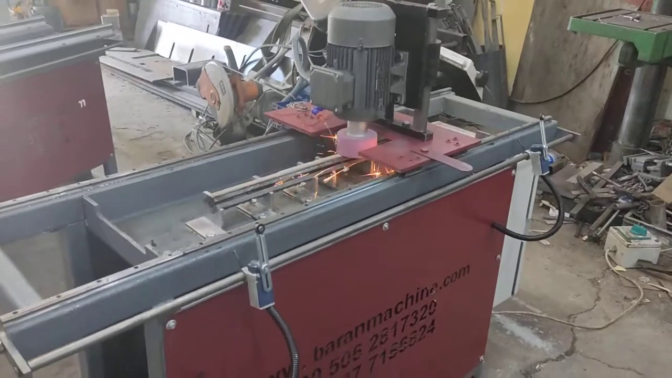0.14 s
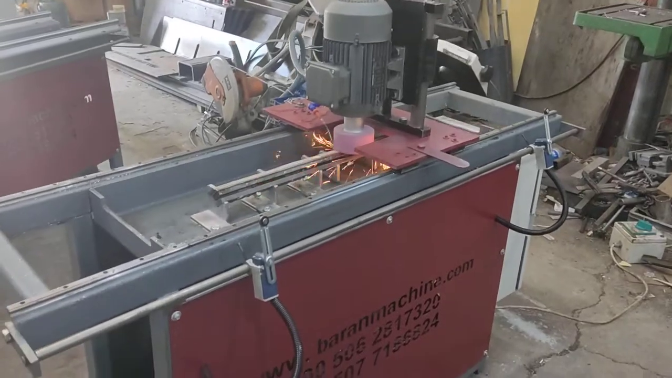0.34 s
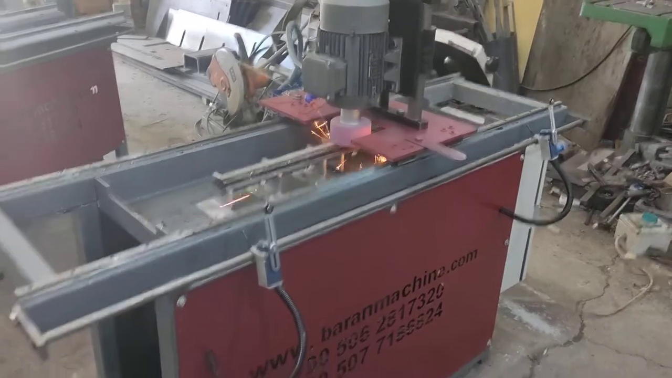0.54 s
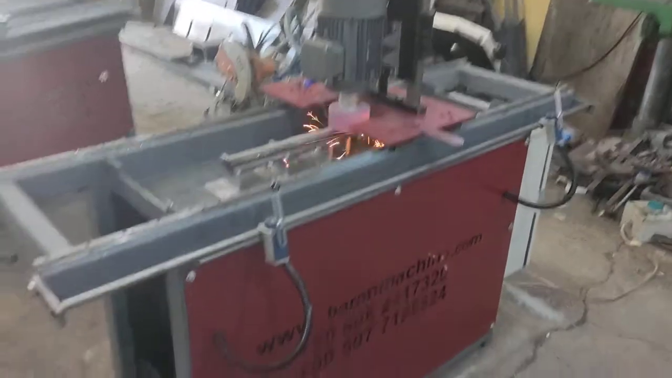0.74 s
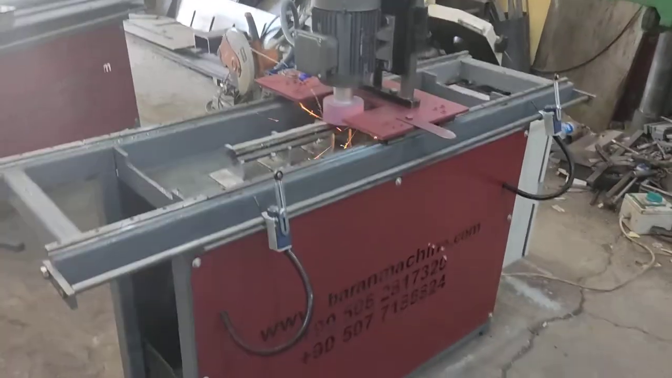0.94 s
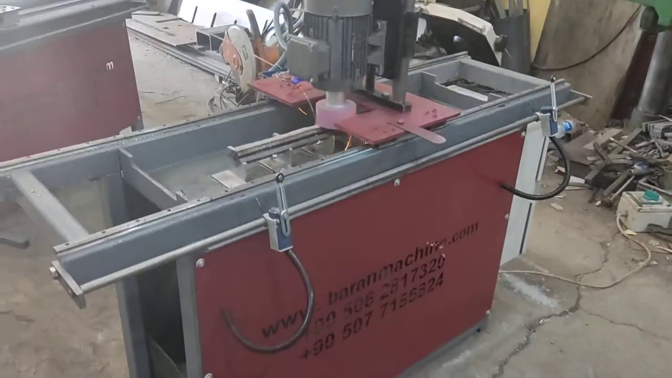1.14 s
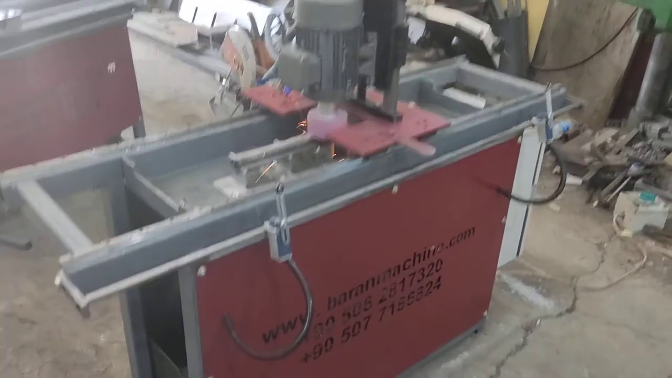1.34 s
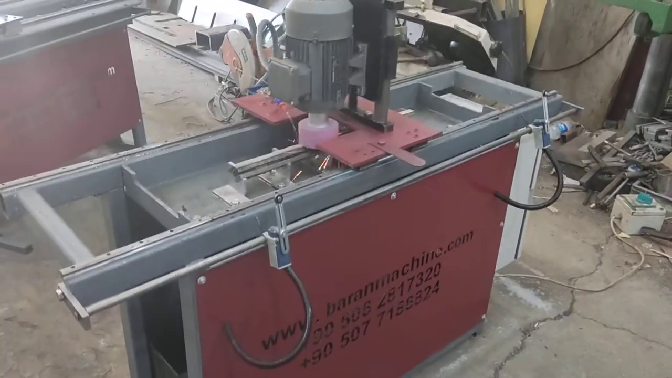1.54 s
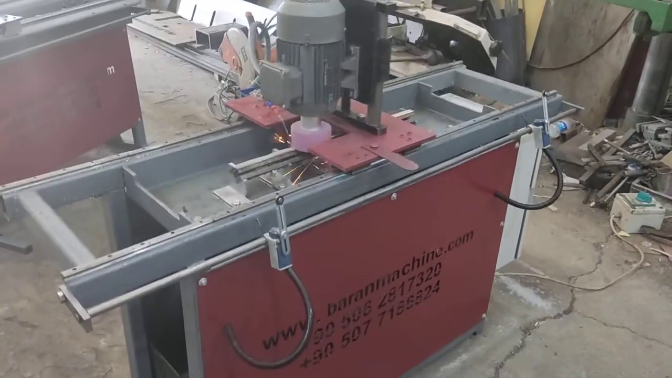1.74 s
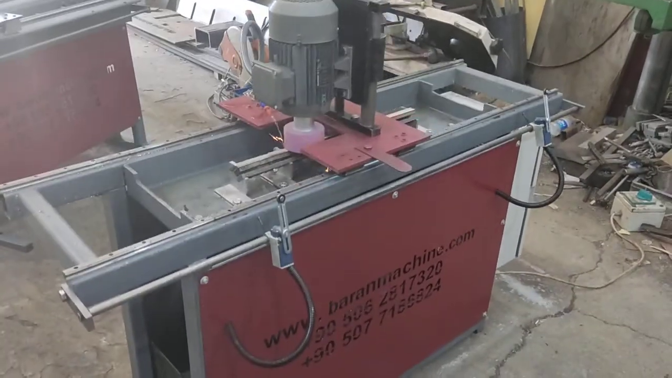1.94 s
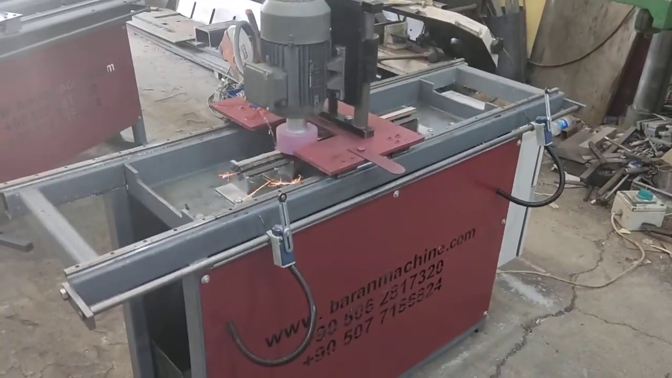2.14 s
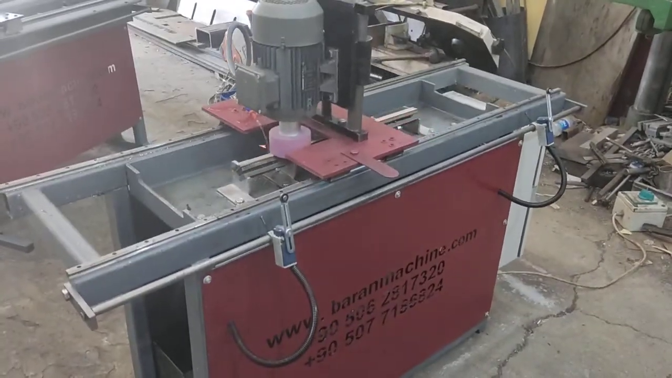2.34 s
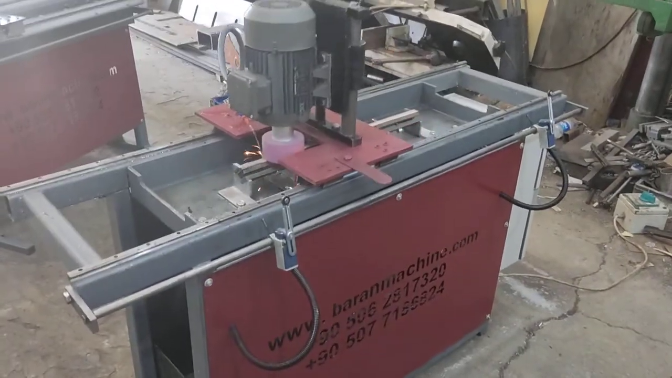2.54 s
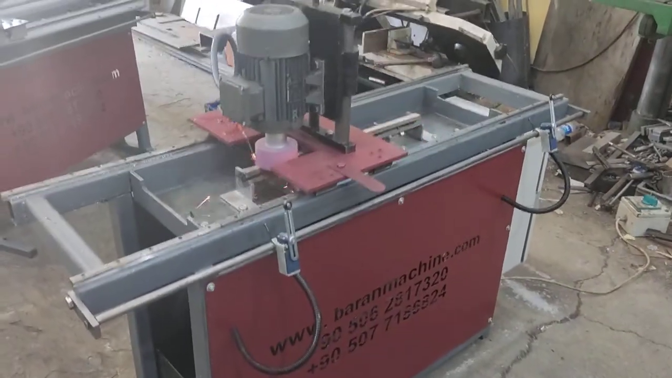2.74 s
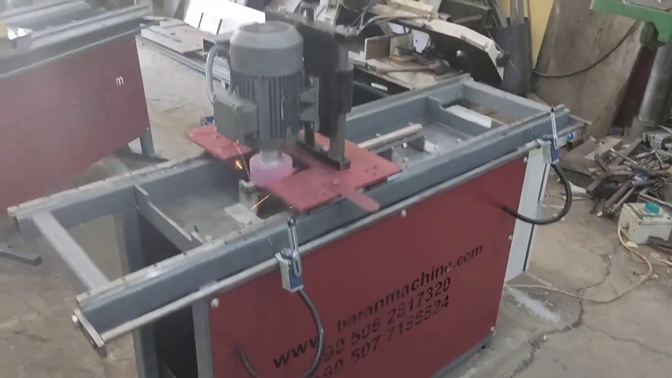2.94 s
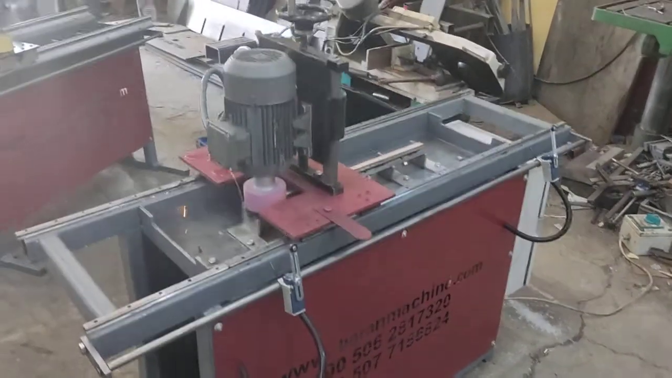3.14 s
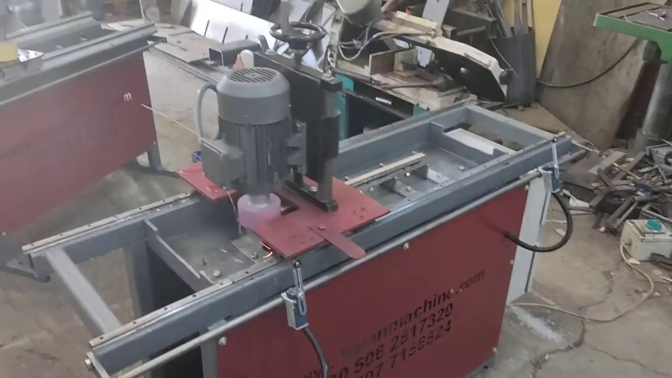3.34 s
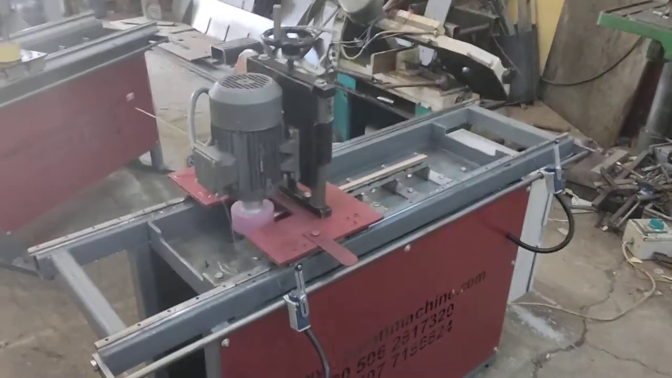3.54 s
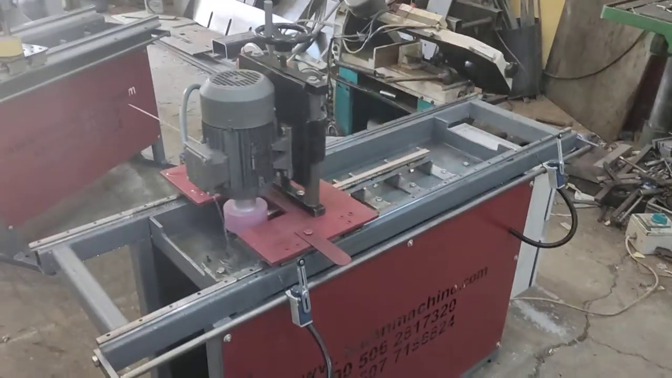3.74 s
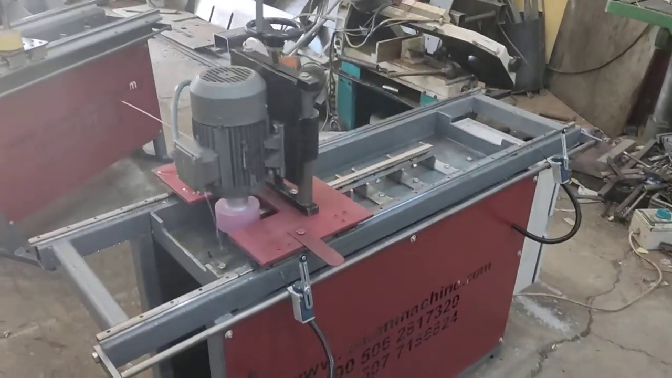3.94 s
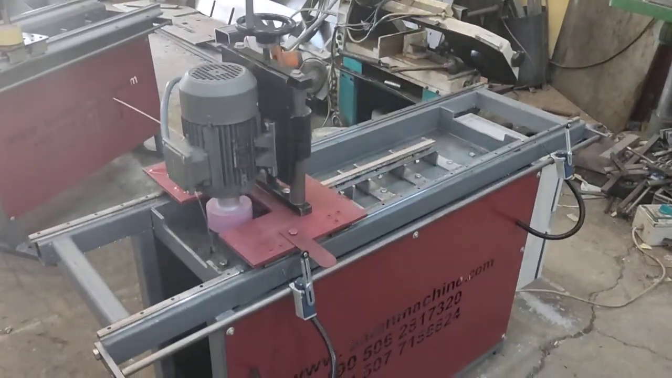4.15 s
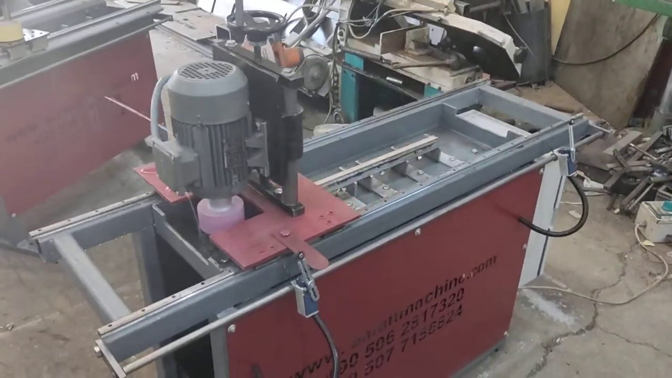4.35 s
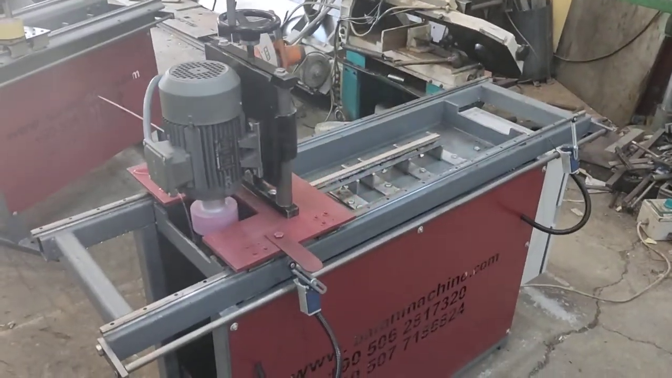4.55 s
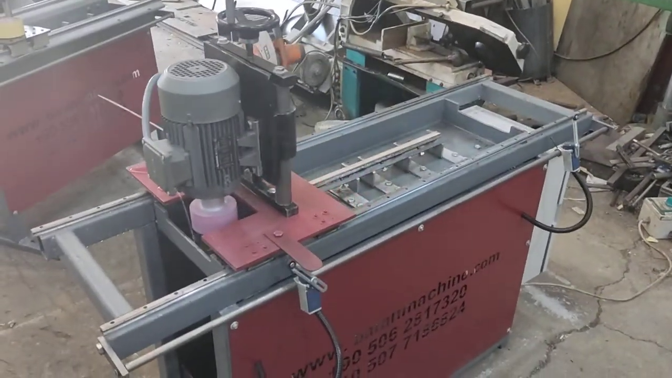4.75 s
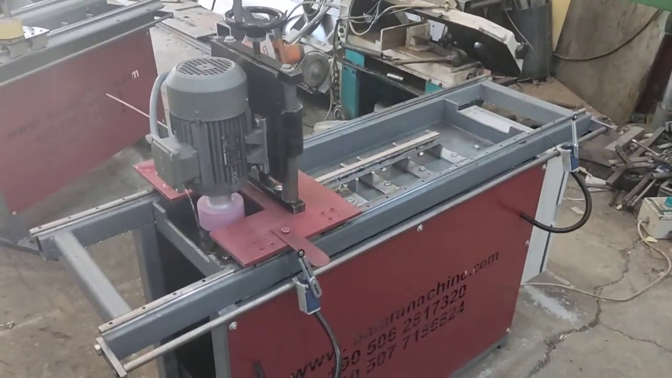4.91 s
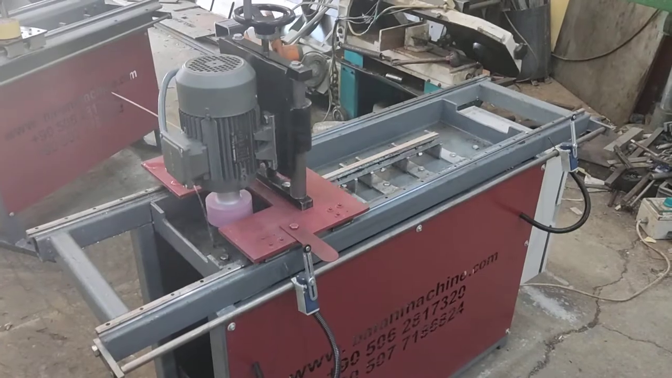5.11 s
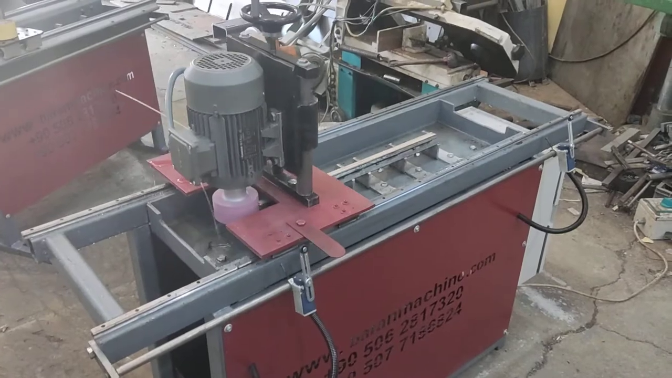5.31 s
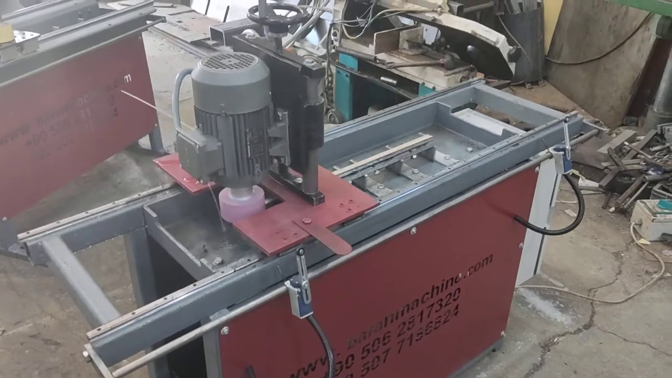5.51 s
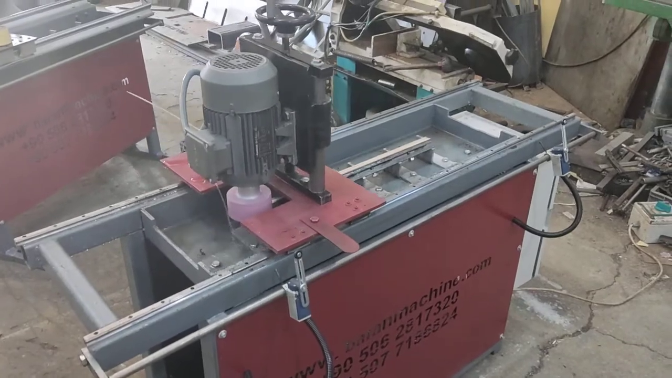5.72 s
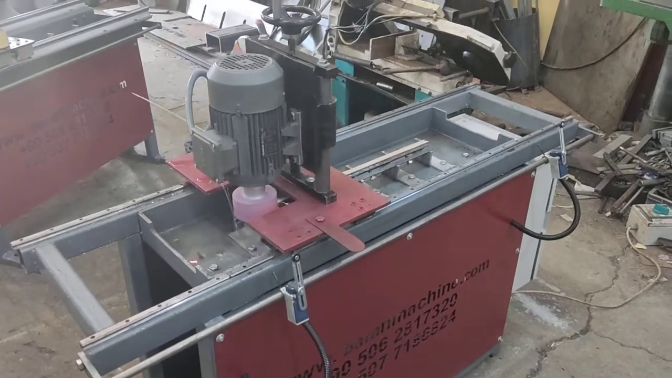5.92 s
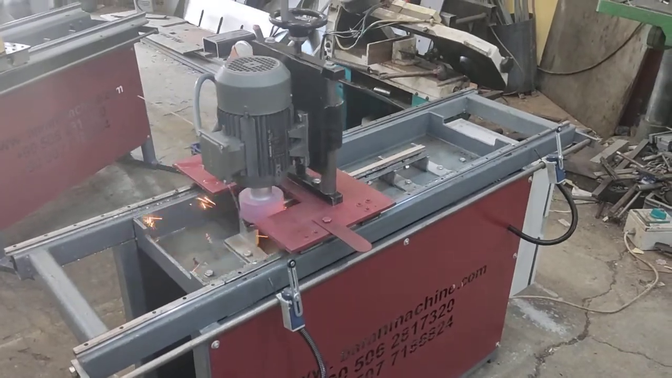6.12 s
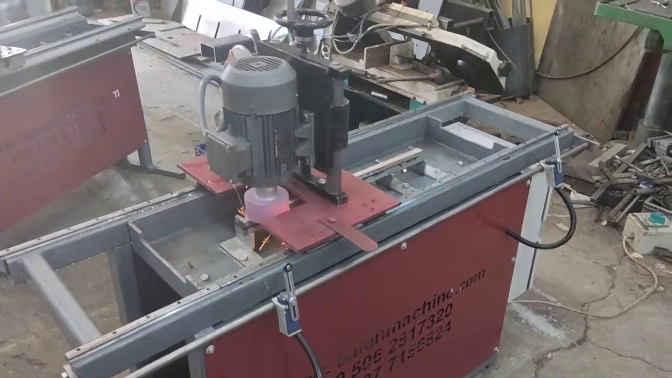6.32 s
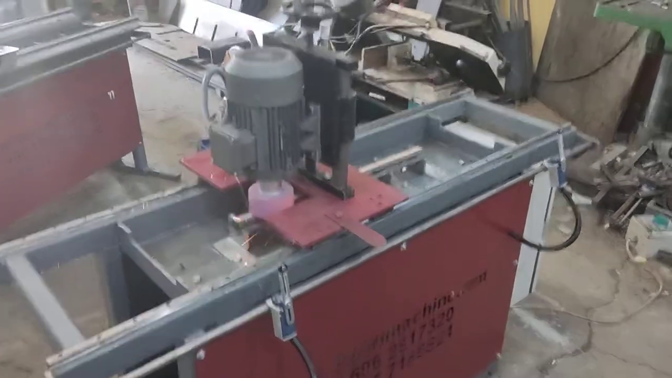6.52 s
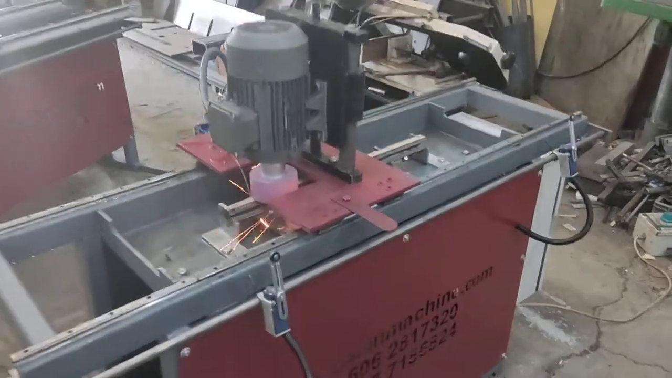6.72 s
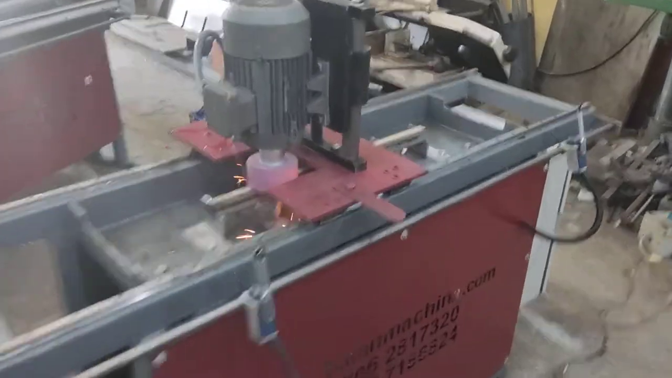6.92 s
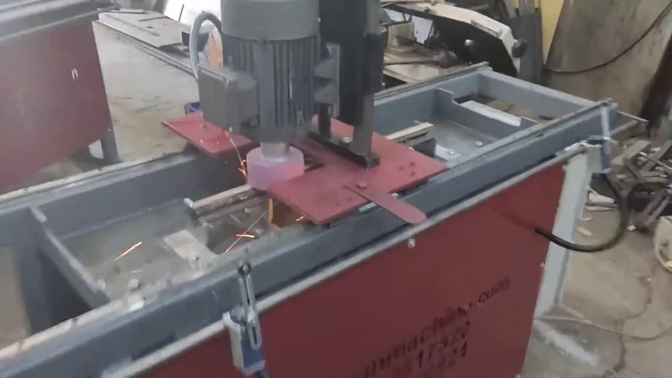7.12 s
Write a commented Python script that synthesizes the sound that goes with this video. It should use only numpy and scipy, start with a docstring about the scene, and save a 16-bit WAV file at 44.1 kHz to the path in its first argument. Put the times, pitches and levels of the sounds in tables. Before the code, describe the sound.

In a workshop, heard fairly close in wide stereo, a spinning grinding wheel rasps along a long steel blade with buzzing growl, gritty hiss, metallic ringing and piercing squeals. It runs off the end, leaving an airy motor whirr and low hum. Several sharp gear clacks follow with a short room tail, then the wheel scrapes the tip and grinding returns abruptly.

```python
"""A grinding wheel runs along a long steel blade, scratching it with its grit and growling once a turn.
The growl is a stack of tones tied to the turning speed; the hiss is noise, partly repeated each turn.
The same kind of scratching, sent through narrow resonances, makes the steel ring, squeal and sing.
The wheel runs off the end, gear clacks sound as bursts of noise and dying tones, and the wheel bites again.
Behind it all a motor runs: airy noise, a ringing housing and steady or wavering low tones."""
import sys
import numpy as np
from scipy import signal
from scipy.fft import rfft, irfft, next_fast_len
from scipy.io import wavfile
from scipy.ndimage import uniform_filter1d

SR = 44100
rng = np.random.default_rng(int(sys.argv[2]) if len(sys.argv) > 2 else 0)


def inscribe(sig):
    """Save sig as 16-bit PCM at rate SR to the path in sys.argv[1].

    A 1-D sig is mono; a 2-D sig holds one channel per row.
    Samples are clipped to [-1, 1] before scaling.
    """
    pcm = np.round(np.clip(np.atleast_2d(sig).T, -1, 1) * 32767)
    wavfile.write(sys.argv[1], SR, pcm.astype(np.int16))


N = 316197
TIME = np.arange(N) / SR  # seconds
BINS = np.maximum(np.arange(N // 2 + 1) * SR / N, 1)  # frequencies of the spectrum, Hz


# growl of the wheel's uneven face: times_turn_rate, relative_level_db
FACE = [(6, -4.5), (7, -6.5), (8, -6), (9, -2.5), (10, -6.5), (11, -6), (12, -4), (13, -11.5), (14, -7.5),
        (15, -5.5), (16, -7), (17, -11.5), (18, -5.5), (19, -4), (20, -13), (21, -9), (22, -11.5),
        (23, -11), (24, -17), (25, -21)]
# rasp of the face's finer bumps: pitch_hz, relative_level_db
RASP = [(1280, 1.5), (1450, 1), (1650, 6), (1900, -1), (2200, 0.5), (2400, 0.5), (2600, -59), (2900, 4),
        (3200, -39)]
# loudness of the uneven face, one table a pass: time_s, growl_db, rasp_db
FACE_LEVEL = [
    [(0, -29.5, -36), (.55, -30.5, -31.5), (1.05, -33, -40), (1.25, -32.5, -29.5), (2.4, -36.5, -33.5),
     (2.62, -30, -29), (2.9, -28, -28), (3.25, -31.3, -34.5), (3.55, -31, -30)],
    [(6.08, -31.5, -29.5), (6.35, -30, -34), (6.9, -35.5, -28), (7.17, -36.5, -30)],
]
# colour of the grit noise: pitch_hz, level_db_per_hz
GRIT = [(180, -14), (290, -4.5), (520, -3), (1000, -7.5), (1700, 0), (2200, 3), (2700, -3), (2950, 0.5),
        (3400, -6), (3800, 3), (4400, 4.5), (5400, 0.5), (6200, -6), (7050, -2), (8300, 7), (9300, 1.5),
        (12300, -14), (14300, -6.5)]
# side the grit is heard on: pitch_hz, left_minus_right_db
GRIT_PAN = [(300, -6), (1000, -8.5), (1800, 0), (2800, 0), (3400, 1), (4700, 5.5), (6200, 0), (7100, 13),
            (8200, -33), (10000, -5), (11300, 1), (12300, 1), (14200, 21)]
# hiss at the blade's tip, its rise per second of travel from the tip, its share of the pressure's swing
HISS_DB, HISS_RISE_DB_PER_S, HISS_FOLLOWS = -28.5, 1.32, .25


def wheel(turns):
    """The uneven face growls and rasps; the grit hisses more with pressure and distance from the tip."""
    growl_db, rasp_db = in_time(FACE_LEVEL[0] + FACE_LEVEL[1])
    growl = turn_lines(turns, FACE, waver_db=2.0, fade_db=1.35) * sides(-0.67)
    growl = from_db(growl_db) * contact(touch_db=-27, release_db_per_s=74) * growl
    fine = [(k, at_hz(RASP, k * SPEED[-1][1])) for k in range(26, 64)]
    rasp = turn_lines(turns, fine, waver_db=3.5, fade_db=1.4) * sides(-6.0)
    rasp = from_db(rasp_db) * contact(touch_db=-13, release_db_per_s=88) * rasp

    pressure_db = in_passes(PRESSURE)
    swing_db = pressure_db - np.mean(pressure_db)
    from_tip_s = np.maximum(np.maximum(PASSES[0][1] - TIME, TIME - PASSES[1][0]), 0)
    hiss_db = HISS_DB + HISS_RISE_DB_PER_S * from_tip_s + HISS_FOLLOWS * swing_db
    force = grit_force(turns, repeat=.25, lumpy_db=2.4, flutter_db=.6)
    hiss = from_db(hiss_db) * airborne(force, GRIT, GRIT_PAN)
    return growl + rasp + (hiss + sparks()) * contact(touch_db=-10, release_db_per_s=67)


# blade resonances that swell as the wheel passes: middle_s, half_length_s, pitch_hz, width_hz, gain_db
SWELLS = [(0.1, 0.65, 380, 37, 14.5), (0.17, 0.44, 1565, 35, 14), (0.55, 0.53, 2350, 110, 21.5),
          (0.27, 0.32, 1030, 45, 9), (0.87, .7, 835, 26, 11), (0.76, 0.52, 590, 23, 6.5),
          (1.33, 0.57, 627, 63, 11), (1.35, 0.23, 1410, 50, 10), (2, 0.22, 1600, 70, 5),
          (1.92, 0.64, 1586, 29, 15), (2.15, 1, 1288, 20, 9), (1.85, .2, 1300, 22, 11),
          (1.3, .22, 2030, 30, 7), (0.6, 0.32, 2200, 42, 13), (1.5, .3, 890, 22, 9.5),
          (2.75, 0.36, 2100, 22, 5), (2.5, .75, 1900, 20, 10.5), (2.78, 0.39, 942, 21, 16),
          (2.75, 0.13, 2000, 68, 16), (2.9, .44, 1910, 160, 4), (2.97, .55, 595, 30, 6),
          (3.1, 0.44, 297, 33, 6.5), (3.53, .12, 1640, 35, 6), (6.1, 0.18, 1640, 27, 11),
          (6.44, 0.49, 762, 33, 17.5), (6.57, 0.62, 310, 43, 6), (6.73, .55, 1890, 54, 10.5),
          (6.34, 0.67, 2040, 75, 10), (6.95, .25, 2160, 70, 4), (8.3, 0.13, 945, 22, 7),
          (7.4, .4, 630, 23, 9), (1.4, 0.23, 1037, 22, 9), (2.84, .4, 770, 80, 4)]
# the tones wander in phase, more so the higher they are
LINE_WANDER_RAD_PER_KHZ = .55


def turn_lines(turns, orders, waver_db, fade_db):
    """Tones at multiples of the turn rate, lifted by the blade's resonances; overall power held at one."""
    out, power, knots = np.zeros((2, N), np.float32), 0, np.arange(0, N / SR + .05, .05)
    turn_hz, angle = np.interp(knots, *np.transpose(SPEED)), 2 * np.pi * (turns % 1)

    def chance(size):
        return rms_one(uniform_filter1d(rng.standard_normal(len(knots)), size=size))

    for k, db in orders:
        lift = 0
        for middle, half, hz, width, gain_db in SWELLS:
            lift = lift + gain_db * np.exp(-((knots - middle) / half) ** 4 - ((k * turn_hz - hz) / width) ** 2)
        waver, fade = chance(size=4), chance(size=12)
        # tones fade most where no resonance holds them
        gain = from_db(db + lift + waver_db * waver + fade_db * fade * np.exp(-np.abs(lift) / 10))
        wander = LINE_WANDER_RAD_PER_KHZ * k * turn_hz / 1000 * chance(size=2)
        start = 2 * np.pi * rng.random()
        phase = (k * angle + np.interp(TIME, knots, wander + start)).astype(np.float32)
        # each tone reaches the two sides with a phase gap of its own
        apart = np.arccos(np.clip(at_hz(LIKENESS, k * turn_hz[0]), -1, 1)) * rng.choice([-1, 1])
        tone = np.sin(phase + np.float32([[0], [apart]]))
        out += np.interp(TIME, knots, gain).astype(np.float32) * tone
        power = power + gain ** 2 / 2
    return out / np.interp(TIME, knots, np.sqrt(power))


def once_a_turn(turns, size):
    """A random profile round the wheel's rim, met again on every turn."""
    return np.interp(turns % 1, np.arange(size) / size, rms_one(rng.standard_normal(size)), period=1)


def grit_force(turns, repeat, lumpy_db, flutter_db):
    """Grains scratch the steel: partly the same ones each turn, harder on the wheel's high spots."""
    repeat = np.clip(repeat, 0, 1)
    same = rms_one(np.array([once_a_turn(turns, size=900), once_a_turn(turns, size=900)]))
    force = np.sqrt(repeat) * same + np.sqrt(1 - repeat) * rng.standard_normal((2, N))
    return force * from_db(lumpy_db * once_a_turn(turns, size=14) + flutter_db * drift(70))


SPARKS_PER_S, SPARK_DB = 40, -41


def sparks():
    """Grains break off at random, most of them small, each with a bright tick."""
    ticks = (rng.random(N) < SPARKS_PER_S / SR) * from_db(4 * np.minimum(rng.exponential(1, N), 3))
    return from_db(SPARK_DB) * airborne(ticks * rng.choice([-1, 1], (2, N)), CLACK_TREBLE, FAN_PAN)


# passes of the wheel along the blade, the first already under way: touch_s, run_off_s
PASSES = [(-1, 3.577), (6, 8)]
BITE_S = .22  # time the wheel takes to bite fully


def contact(touch_db, release_db_per_s):
    """A grinding sound starts softly at the touch, grows as the wheel bites and dies as it runs off."""
    gain = 0
    for touch, run_off in PASSES:
        unbitten = 1 - np.clip((TIME - touch) / BITE_S, 0, 1)
        gain_db = touch_db * unbitten ** 1.5 - release_db_per_s * np.maximum(TIME - run_off, 0)
        gain = gain + (TIME >= touch) * from_db(gain_db)
    return gain


# side each is heard on: time_s, ring_left_minus_right_db, squeal_left_minus_right_db
BEARING = [(0, 22, -7), (.7, 10, -11), (1.3, 2, -18), (2.0, 2.5, -16), (3.0, 3, -14), (3.7, 6, -13),
           (5.9, 8, -10), (6.5, -5, -13), (7.17, 30, -4)]
# notes of the freely ringing steel: pitch_hz, width_hz, relative_level_db
RING_MODES = [(3850, 70, -13.5), (4014, 34, 0), (4095, 42, -1.2)]
SQUEAL_MODES = [(8360, 140, -12), (8583, 52, -1.5), (8800, 42, 0)]
# notes of the steel when damped: pitch_hz, width_hz, relative_level_db
DAMPED_MODES = [(3850, 150, 0), (3990, 150, .5), (4150, 110, -1.5), (4400, 150, -8)]
DAMPED_SQUEAL_MODES = [(8480, 220, -4), (8690, 170, -2), (8840, 110, 0)]
# pitch moves with the wheel's place and sags at the free tip: time_s, shift_hz
RING_SHIFT = [(0, 20), (.5, 30), (.8, -62), (1.05, -44), (1.25, 15), (1.7, 16), (2.1, -12), (2.5, -4),
              (3.0, -15), (3.3, -40), (3.42, 15), (3.6, -38), (3.67, -190), (5.92, -190), (5.97, -70),
              (6.02, 0), (6.22, 4), (6.33, -50), (6.6, -10), (6.8, 7)]
# the squeal bends with the bite of the wheel: time_s, shift_hz
SQUEAL_SHIFT = [(0, -1), (1.1, 15), (1.4, -12), (1.9, -12), (2.2, 5), (2.38, 90), (2.52, -5), (3.1, -10),
                (3.4, -20), (6.0, -13), (6.5, -8), (6.9, 7)]
# level of the ring near 4 kHz before flutter, one table a pass: time_s, level_db
RING = [
    [(0, -29), (.9, -28.5), (1.08, -30), (1.22, -22.5), (1.5, -21.5), (1.88, -23.5), (2.1, -27),
     (2.35, -24), (2.8, -24), (3.05, -28), (3.44, -28.5), (3.54, -33.5)],
    [(6.08, -33), (6.62, -37.5), (6.85, -23.5), (7.17, -28.5)],
]
# squeal between catches, before flutter and a 3 dB lift, one table a pass: time_s, level_db
SQUEAL = [
    [(0, -24), (1.0, -23), (2.4, -26.5), (3.4, -24.5), (3.58, -30.5)],
    [(6.08, -24), (6.6, -21), (6.85, -24.5), (7.17, -33)],
]
# steel locks to the wheel and throbs: middle_s, half_length_s, beats_per_turn, depth_db, pitch_swing_hz
RING_THROBS = [(1.36, .2, 1, 3.0, 20), (1.46, .33, 2, 3.9, 40), (2.55, .15, 3, 2.6, 15),
               (1.78, .22, 4, 2.8, 20), (2.18, .28, 2, 3.2, 20), (2.2, .25, 1, 2.6, 10),
               (2.85, .3, 4, 3.2, 20), (3.3, .25, 1, 2.2, 10), (6.85, .2, 1, 3.0, 10)]
SQUEAL_THROBS = [(2.98, .14, 4, 2.8, 0), (6.42, .45, 4, 2.7, 0)]
# the wheel catches and the squeal flares, or skips and it sinks: middle_s, half_length_s, gain_db
CATCHES = [(0.15, .03, 3.5), (0.314, 0.055, 6), (0.883, 0.019, 9.5), (1.08, 0.036, 3), (1.353, 0.021, -0.5),
           (1.685, .035, 5), (2.02, 0.035, -0.5), (2.373, .035, 0), (2.907, 0.06, 5), (3.135, 0.03, 5),
           (5.87, .012, 6), (5.963, 0.0086, 6), (6.053, .005, -7), (6.136, .005, -10), (6.166, .004, -11),
           (6.272, 0.013, -11), (6.36, .025, 2.5), (6.397, 0.0066, -12), (6.417, 0.019, 0),
           (6.49, .012, -8)]
# stick and slip make ring and squeal flutter
FLUTTER_PER_S, RING_FLUTTER_DB, SQUEAL_FLUTTER_DB = 14, 0.88, 1.5
# the part of a flare above this gain is a pure shriek
SHRIEK_ABOVE_DB, SHRIEK_HZ = 5.5, 8830


def steel(turns):
    """Grit drives a ring near 4 kHz and a squeal above 8 kHz, which flares when the wheel catches."""
    ring_pan, squeal_pan = in_time(BEARING)
    force = grit_force(turns, repeat=.45, lumpy_db=1.8, flutter_db=.8)
    ring = sing(force, RING_MODES, DAMPED_MODES, band_hz=(3720, 4540), evenness=0.94,
                shift_hz=in_time(RING_SHIFT)[0])
    ring = throb(spread(ring, alike=0.7), turns, RING_THROBS)
    ring_gain = from_db(in_passes(RING) + RING_FLUTTER_DB * drift(FLUTTER_PER_S))
    ring_gain = ring_gain * contact(touch_db=-16, release_db_per_s=125)

    force = grit_force(turns, repeat=.3, lumpy_db=1.8, flutter_db=.9)
    squeal = sing(force, SQUEAL_MODES, DAMPED_SQUEAL_MODES, band_hz=(8180, 9020), evenness=0.9,
                  shift_hz=in_time(SQUEAL_SHIFT)[0])
    squeal = throb(spread(squeal, alike=0.2), turns, SQUEAL_THROBS)
    squeal_gain = from_db(in_passes(SQUEAL) + 3.0 + SQUEAL_FLUTTER_DB * drift(FLUTTER_PER_S))
    squeal_gain = squeal_gain * contact(touch_db=-18.5, release_db_per_s=147)

    flare = from_db(sum(db * np.exp(-((TIME - s) / half) ** 2) for s, half, db in CATCHES))
    rough = np.minimum(flare, from_db(SHRIEK_ABOVE_DB))
    shriek = np.sqrt(2 * (flare ** 2 - rough ** 2)) * np.sin(2 * np.pi * SHRIEK_HZ * TIME)
    squealing = squeal_gain * (rough * squeal + shriek) * sides(squeal_pan)
    return ring_gain * ring * sides(ring_pan) + squealing


# how damped the steel is under the wheel: time_s, share_0_to_1
DAMPING = [(0, .9), (1.05, 0.76), (1.25, 0.13), (2.8, 0.06), (3.6, 0.16), (6.55, 0.33), (6.8, 0),
           (7.17, 0.5)]


def sing(force, free_modes, damped_modes, band_hz, evenness, shift_hz=0):
    """Steel between free and damped; friction limits its swing, which evens out the loudness."""
    damped = np.clip(in_time(DAMPING)[0], 0, 1)
    free_sound = resonate(force, free_modes, band_hz, shift_hz)
    damped_sound = resonate(force, damped_modes, band_hz, shift_hz)
    x = (1 - damped) * free_sound + damped * damped_sound
    power = uniform_filter1d(np.mean(x ** 2, axis=0), size=1300)
    return rms_one(x / (np.abs(power) + 1e-9) ** (np.clip(evenness, 0, 1) / 2))


LOCK_SHARE = .7  # share of its random flicker that the steel loses while locked


def throb(x, turns, throbs):
    """Steel locked to the wheel swaps random flicker for regular beats of level and pitch, at equal power."""
    beat_db, bend_hz, locked = 0, 0, 0
    for s, half, beats, depth_db, swing_hz in throbs:
        window = np.exp(-np.minimum(np.square(np.square((TIME - s) / half)), 20))
        beat = window * np.cos(2 * np.pi * beats * turns)
        beat_db = beat_db + depth_db * beat
        bend_hz = bend_hz + swing_hz * beat
        locked = np.maximum(locked, window)
    # turning the phase of the complex signal bends its pitch
    complex_x = signal.hilbert(x, next_fast_len(N))[:, :N]
    bent = np.real(complex_x * np.exp(2j * np.pi * np.cumsum(bend_hz) / SR))
    flicker = np.abs(uniform_filter1d(x ** 2, size=130)) + 1e-3
    beating = bent * from_db(beat_db) / flicker ** (LOCK_SHARE * locked / 2)
    return beating * np.sqrt(uniform_filter1d(x ** 2, size=3600) / uniform_filter1d(beating ** 2, size=3600))


# singing overtones: middle_s, half_length_s, pitch_hz, width_hz, level_db, left_minus_right_db
OVERTONES = [(0.24, .5, 4380, 65, -40, 10), (.4, .5, 5400, 70, -42, 9), (1.24, .17, 5300, 24, -36, 5),
             (1.5, .11, 3800, 10, -39, 5), (1.4, .22, 4100, 16, -36, 7), (1.55, 0.36, 5230, 55, -43, 9),
             (1.94, 0.11, 5500, 10, -38.5, 5), (2.45, .16, 4511, 10, -38, 11), (2, 0.41, 4100, 16, -44, 7),
             (2.9, .36, 3900, 22, -44, 5), (2.8, .35, 5060, 26, -42, 10), (6.12, 0.16, 3900, 22, -34, 5),
             (6.15, 0.1, 5130, 34, -33, 7), (6.72, .2, 3900, 16, -42, -2), (6.5, .14, 5080, 90, -36, 9),
             (1.74, 0.11, 8590, 24, -34, -16), (6.42, 0.45, 8580, 26, -30, -10),
             (6.85, 0.12, 8610, 26, -28, -15)]


def overtones(turns):
    """The grit keeps single overtones of the blade singing for a stretch of its length each."""
    force, out = grit_force(turns, repeat=0.29, lumpy_db=0.5, flutter_db=0.0), np.zeros((2, N))
    for s, half, hz, width, db, pan_db in OVERTONES:
        near = slice(max(int((s - 1.6 * half) * SR), 0), int((s + 1.6 * half) * SR))
        swell = np.exp(-((TIME[near] - s) / half) ** 4)
        tone = spread(held_mode(force[:, near], hz, width), alike=0.67)
        out[:, near] += from_db(db) * swell * tone * sides(pan_db)
    return out


# notes of the clamp bar: pitch_hz, width_hz, relative_level_db
CLAMP_MODES = [(4560, 130, -4), (4830, 170, -1), (5080, 160, -1), (5280, 130, -2)]
# how hard the wheel presses, as the clamp's buzz before a 4 dB cut, one table a pass: time_s, level_db
PRESSURE = [
    [(0.03, -36.5), (0.28, -32.5), (0.98, -39), (1.24, -36), (1.96, -35.5), (2.16, -40), (2.4, -35),
     (3.44, -37.5), (3.55, -39.5)],
    [(6.08, -35), (6.35, -35), (6.7, -37.5), (7.12, -24)],
]


def clamp(turns):
    """The clamp bar buzzes along with the blade as hard as the wheel presses, mostly on the left."""
    force = grit_force(turns, repeat=0.45, lumpy_db=2.5, flutter_db=1.0)
    buzz = resonate(force, CLAMP_MODES, band_hz=(4300, 5550))
    gain = from_db(in_passes(PRESSURE) - 4.0) * contact(touch_db=-14, release_db_per_s=120)
    return gain * spread(buzz, alike=0.23) * sides(16.0)


# the free tip rings as the wheel leaves and meets it: middle_s, half_length_s, pitch_hz, width_hz, level_db
TIP_RINGS = [(3.602, 0.019, 4000, 50, -27.5), (3.65, .025, 3780, 50, -36), (3.73, 0.053, 4005, 14, -47),
             (5.865, .008, 3810, 160, -33), (5.917, .02, 3800, 120, -32.5)]


def blade_tip(turns):
    """The wheel's rim scrapes over the end of the blade and makes it ring."""
    force, rings = rng.standard_normal((2, N)) * from_db(2.5 * once_a_turn(turns, size=14)), 0
    for s, half, hz, width, db in TIP_RINGS:
        swell = np.exp(-((TIME - s) / half) ** 2)
        rings = rings + from_db(db) * swell * held_mode(force, hz, width)
    return spread(rings, alike=0.89)


# blows of the reversing gear, rebounds and first touch: start_s, treble_db, body_db, thump_db, decay_t60_s
CLACKS = [(4.033, -31, -60, -65, .02), (4.392, -30, -42, -60, 0.04), (4.5485, -20.5, -44, -55, 0.03),
          (4.5525, -24, -44, -60, .02), (4.569, -31, -37, -55, .05), (4.577, -23.5, -22.5, -32.5, 0.07),
          (4.585, -30, -25, -45, .045), (4.605, -29, -31, -50, .04), (4.63, -34, -35, -55, .04),
          (4.663, -40, -32.5, -55, .04), (4.836, -27, -37, -32, 0.035), (4.8405, -24, -36, -37, .045),
          (4.865, -30, -42, -55, .07), (5.095, -15.5, -38, -55, 0.012), (5.099, -17, -42, -55, 0.0098),
          (5.1168, -29, -46, -60, .015), (5.859, -30, -42, -60, .06)]
# colours of the three parts of a clack: pitch_hz, level_db_per_hz
CLACK_TREBLE = [(1500, -12), (3000, -5.5), (4400, -7.5), (5800, -9), (8200, 4), (10500, -1.5), (12500, -7),
                (14000, -12)]
CLACK_BODY = [(100, -15), (230, -3), (500, -12), (800, -7), (1100, -4), (1900, -3.5), (2450, 1.5),
              (3300, -5), (4500, -10.5), (6000, -13), (8000, -25)]
CLACK_THUMP = [(50, -32), (105, 1), (160, -17), (260, -10), (500, -22), (900, -14), (1300, -29)]
# what the blows set ringing, in the frame and in the switch lever: pitch_hz, relative_level_db, t60_s
FRAME_MODES = [(224, -10, 0.1), (1040, -11, 0.17), (1430, -15, .2), (2410, -8, .18), (3380, -18, .2),
               (3880, -18, .2), (4400, -16, .18), (6080, -20, .14)]
LEVER_MODES = [(3380, -17, .05), (3900, -18, 0.036), (4620, -13, .04), (6600, -15, .05), (8000, -7, .04),
               (8500, -14, .05), (12480, -16, .08)]
# the first contact of a blow snaps: level against the blow's treble, and decay time
SNAP_DB, SNAP_T60_S = -0.5, .005
ROOM_T60_S = 0.7  # fall by 60 dB of the body's tail in the room


def clacks(rise_s=0.0005, treble_room_db=-13.0, body_room_db=-11, treble_t60=0.3, thump_t60=0.53,
           frame_db=-1.0, lever_db=0.0):
    """Each blow cracks, rings the lever and the frame and thumps the bed; the workshop adds a longer tail."""
    treble, body, thump = np.zeros((3, N))  # power over time
    rings, age = np.zeros((2, N)), np.arange(SR // 2) / SR
    attack, build = 1 - np.exp(-age / rise_s), 1 - np.exp(-age / 0.0052)

    def room(db, t60):
        return from_db(db) ** 2 * build * from_db(-120 * age / t60)

    for s, treble_db, body_db, thump_db, t60 in CLACKS:
        span = slice(int(s * SR), int(s * SR) + len(age))
        direct = attack ** 2 * from_db(-120 * age / t60)  # power falls 60 dB in t60
        snap = from_db(2 * SNAP_DB - 120 * age / SNAP_T60_S)
        treble[span] += from_db(treble_db) ** 2 * (snap + direct + room(treble_room_db, treble_t60))
        body[span] += from_db(body_db) ** 2 * (direct + room(body_room_db, ROOM_T60_S))
        thump[span] += room(thump_db, thump_t60)
        frame = from_db(body_db + frame_db) * struck(FRAME_MODES, age)
        lever = from_db(treble_db + lever_db) * struck(LEVER_MODES, age)
        rings[:, span] += attack * (frame + lever)
    out = rings
    for power, spectrum in [(treble, CLACK_TREBLE), (body, CLACK_BODY), (thump, CLACK_THUMP)]:
        out = out + np.sqrt(power) * airborne(rng.standard_normal((2, N)), spectrum, FAN_PAN)
    return out


def struck(modes, age):
    """Dying sines, each with a strength of its own for every blow and a phase for each side."""
    out = 0
    for hz, db, t60 in modes:
        gain = from_db(db + 1.5 * rng.standard_normal() - 60 * age / t60)
        out = out + gain * np.sin(2 * np.pi * (hz * age + rng.random((2, 1))))
    return out


# colour of the fan's air: pitch_hz, level_db_per_hz
FAN = [(15, -19), (28, -5), (110, -8.5), (170, -10), (330, -9.5), (520, -23.5), (800, -9.5), (1800, -17.5),
       (2700, -19), (3800, -16.5), (6000, -23), (7300, -23), (8600, -15), (9800, -20), (11000, -22),
       (14300, -28.5)]
# side the air is heard on: pitch_hz, left_minus_right_db
FAN_PAN = [(60, -0.5), (700, 1), (1400, -5), (2300, -6), (3500, 0), (5500, 5), (7000, 3), (8400, -11),
           (9600, 1), (11000, 3), (14000, 6)]
# resonances of the motor housing: pitch_hz, width_hz, relative_level_db
HOUSING = [(378, 45, 0), (850, 200, -3), (1490, 140, -3.5), (2170, 130, -2.5)]
# out-of-balance drone at five times the turn rate, before its wavering: time_s, level_db
DRONE = [(0, -39.5), (.55, -37.5), (1.3, -42.5), (2.0, -46.5), (2.85, -41), (3.5, -44), (5.8, -46),
         (6.0, -41), (6.5, -43), (7.17, -44.5)]
# steady motor tones: pitch_hz, level_db
HUM = [(30, -53), (109, -54), (143, -57), (386, -50.5), (484.5, -55.5), (630, -57.5), (769, -57.5),
       (1098, -59), (1497, -61)]
# low hum of the carriage drive, before its wavering: time_s, level_db
DRIVE = [(0, -48), (.35, -46), (.47, -57), (.57, -43.5), (1.0, -42), (1.11, -49), (1.2, -42), (1.48, -37),
         (1.55, -46), (1.63, -41.5), (2.5, -41), (3.3, -44.5), (3.9, -50), (5.3, -51), (6.4, -48),
         (7.17, -48)]
FAN_DB = -36.5


def motor(turns, low_hz=69.0, wander=0.098, waver_db=2.0):
    """Fan air, a ringing housing, the spindle's drone, steady tones and the carriage drive's wavering hum."""
    air = from_db(FAN_DB) * airborne(rng.standard_normal((2, N)), FAN, FAN_PAN)
    housing = resonate(rng.standard_normal((2, N)), HOUSING, band_hz=(280, 2500))
    housing = from_db(-42.0) * spread(housing, alike=0.44) * sides(-2.3)
    drone_gain = from_db(in_time(DRONE)[0] + 1.95 * drift(16)) * np.sqrt(2)
    drone = drone_gain * np.sin(2 * np.pi * 5 * turns)
    tones = HUM + [(low_hz, in_time(DRIVE)[0] + waver_db * drift(9))]
    hum = 0
    for hz, db in tones:
        hum = hum + from_db(db) * np.sqrt(2) * np.sin(2 * np.pi * (hz * TIME + wander * drift(7)))
    return air + housing + drone + hum


def resonate(force, modes, band_hz, shift_hz=0, size=1024):
    """Side-by-side resonances of alternating sign that can glide together, heard only within a band."""
    out, shift = 0, np.broadcast_to(shift_hz, N)
    for k, (hz, width, db) in enumerate(modes):
        r, mode, state = np.exp(-np.pi * width / SR), np.empty_like(force), np.zeros((2, 2))
        for i in range(0, N, size):  # the pitch is renewed block by block
            feedback = [1, -2 * r * np.cos(2 * np.pi * (hz + shift[i]) / SR), r * r]
            block = force[:, i:i + size]
            mode[:, i:i + size], state = signal.lfilter([1, 0, -1], feedback, block, zi=state)
        out = out + (-1) ** k * from_db(db) * rms_one(mode)
    band = signal.butter(4, band_hz, "band", fs=SR, output="sos")
    return rms_one(signal.sosfilt(band, out))


def held_mode(force, hz, width):
    """One narrow resonance whose swing is held steady by friction; about unit power."""
    r = np.exp(-np.pi * width / SR)
    x = signal.lfilter([1, 0, -1], [1, -2 * r * np.cos(2 * np.pi * hz / SR), r * r], force)
    return x / np.sqrt(np.abs(uniform_filter1d(np.mean(x ** 2, axis=0), size=900)) + 1e-9)


# how alike left and right are: pitch_hz, likeness_0_to_1
LIKENESS = [(60, 0.89), (250, 0.94), (600, 0.7), (1200, 0.064), (2500, 0.25), (5000, 0), (9000, 0),
            (14000, 0)]


def airborne(pair, spectrum, pan):
    """Stereo noise with a colour and a balance, alike in the bass and diffuse in the treble."""
    both = spread(rfft(pair), at_hz(LIKENESS, BINS)) * sides(at_hz(pan, BINS))
    return rms_one(irfft(both * from_db(at_hz(spectrum, BINS)), N))


def spread(pair, alike):
    """Two unrelated signals become left and right with a given likeness."""
    alike = np.clip(alike, -1, 1)
    shared = np.sqrt(1 + alike) * pair[0]
    opposed = np.sqrt(1 - alike) * pair[1] * [[1], [-1]]
    return (shared + opposed) / np.sqrt(2)


def sides(pan_db):
    """Left and right gains of equal total power."""
    gains = from_db(np.array([[.5], [-.5]]) * pan_db)
    return gains / np.sqrt(np.mean(gains ** 2, axis=0))


def from_db(db):
    """Decibels to gain."""
    return 10 ** (np.asarray(db) / 20)


def rms_one(x):
    """Scale to unit power."""
    return x / np.sqrt(np.mean(x ** 2) + 1e-20)


def in_time(rows):
    """Columns of a curve at every sample."""
    s, *columns = np.transpose(rows)
    return [np.interp(TIME, s, c) for c in columns]


def in_passes(tables):
    """A dB curve at every sample from one table a pass."""
    return in_time([row for rows in tables for row in rows])[0]


def at_hz(points, hz):
    """Read a spectrum on a log-frequency axis."""
    f, value = np.transpose(points)
    return np.interp(np.log(hz), np.log(np.maximum(f, 1)), value)


def drift(rate):
    """Smooth chance: random points of spread 1, rate per second, joined by straight lines."""
    knots = np.arange(0, N / SR + 2, 1 / rate)
    return np.interp(TIME + rng.random(), knots, rng.standard_normal(2048)[:len(knots)])


# spindle speed: time_s, turns_per_s
SPEED = [(0, 48.85), (.5, 48.85), (1.0, 49.1), (1.25, 49.4), (1.9, 49.55), (2.8, 49.55), (3.6, 49.7),
         (3.9, 49.9), (5.8, 49.9), (6.2, 49.7), (7.17, 49.7)]


def scene():
    """One spindle drives all the grinding sounds."""
    turns = np.cumsum(in_time(SPEED)[0]) / SR
    grinding = wheel(turns) + steel(turns) + overtones(turns) + clamp(turns) + blade_tip(turns)
    return grinding + motor(turns) + clacks()


CUTOFF_HZ = 14280


def record(dry):
    """The highest peaks are rounded and the top is cut steeply."""
    rounded = dry / (1 + (dry / .85) ** 6) ** (1 / 6)
    return signal.sosfilt(signal.ellip(16, .2, 80, CUTOFF_HZ, fs=SR, output="sos"), rounded)


dry = scene()
out = record(dry)
inscribe(out)
```